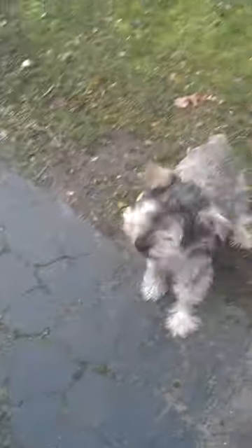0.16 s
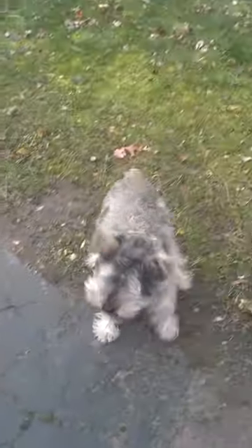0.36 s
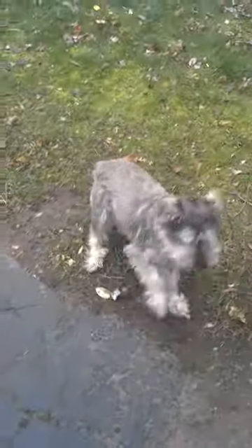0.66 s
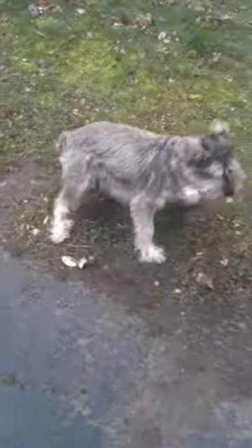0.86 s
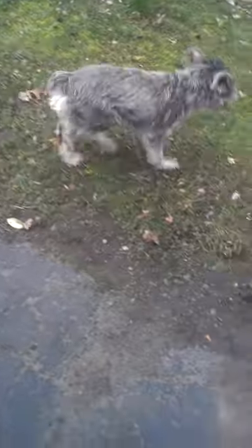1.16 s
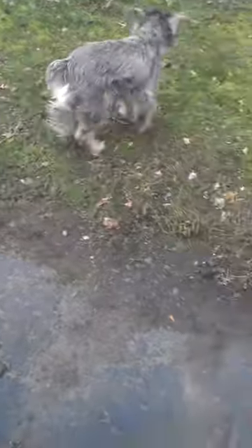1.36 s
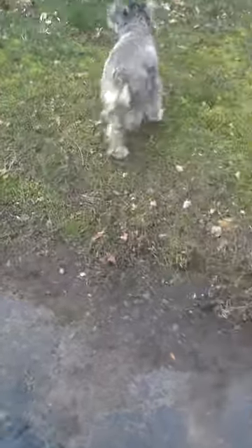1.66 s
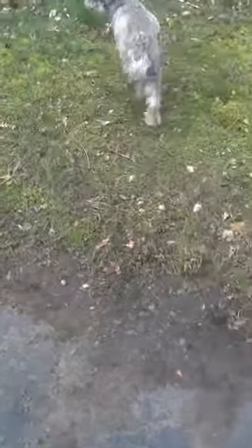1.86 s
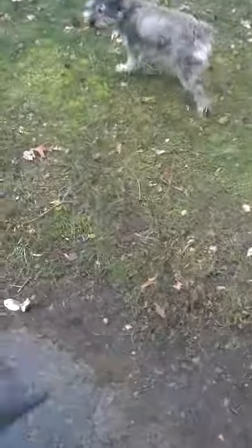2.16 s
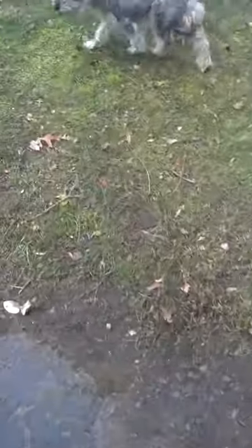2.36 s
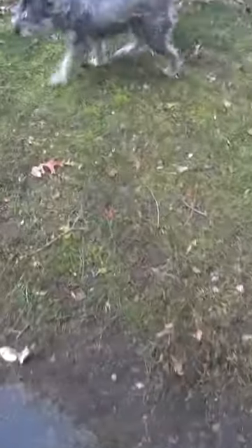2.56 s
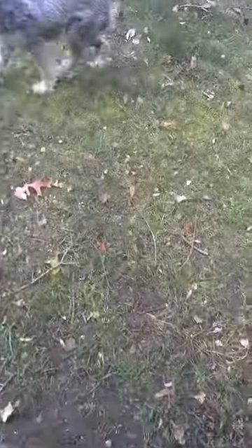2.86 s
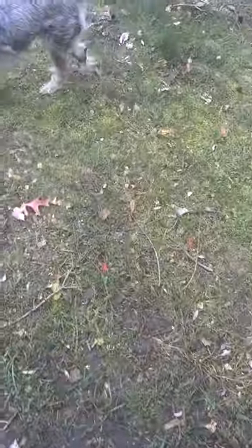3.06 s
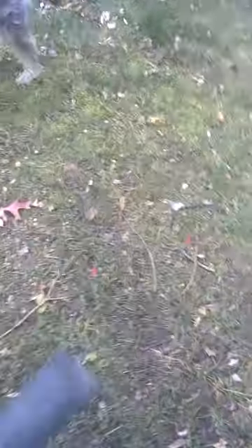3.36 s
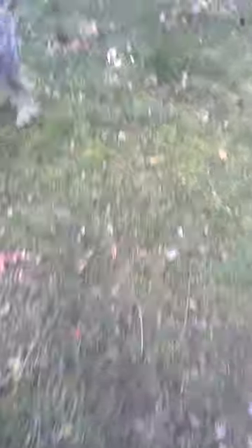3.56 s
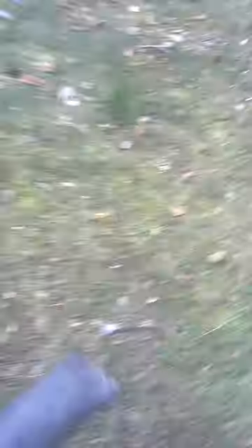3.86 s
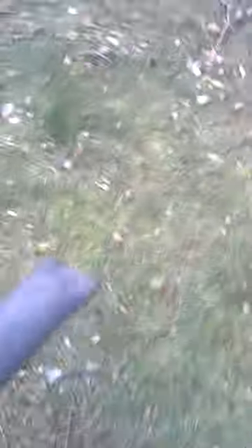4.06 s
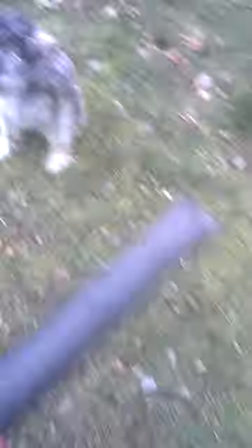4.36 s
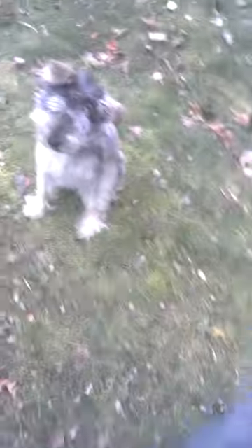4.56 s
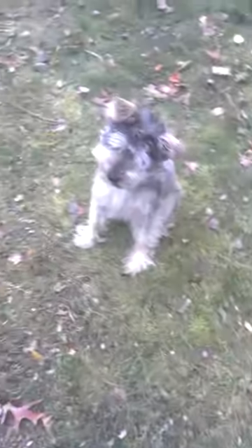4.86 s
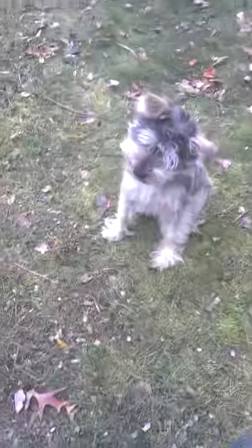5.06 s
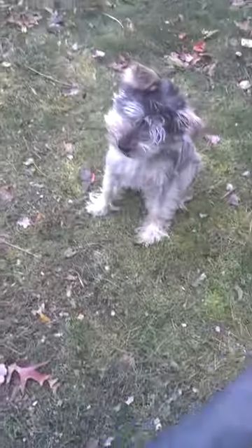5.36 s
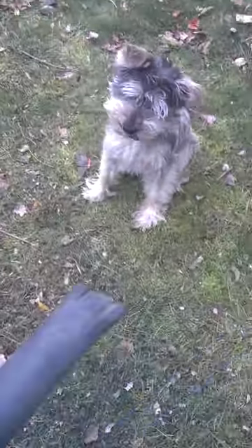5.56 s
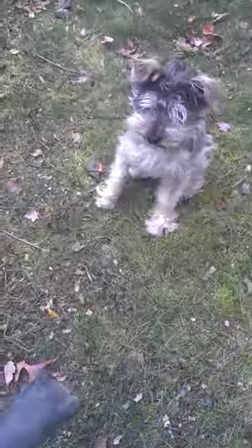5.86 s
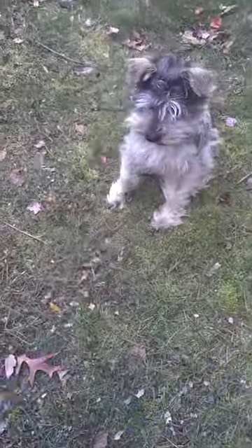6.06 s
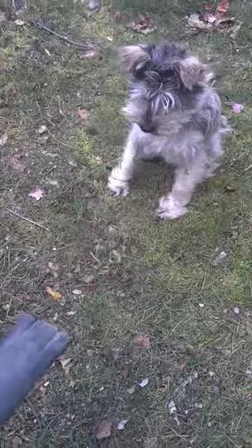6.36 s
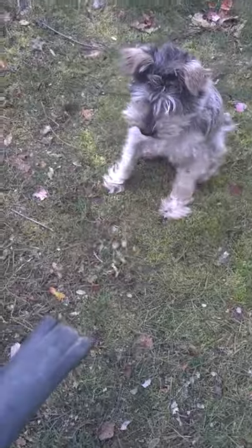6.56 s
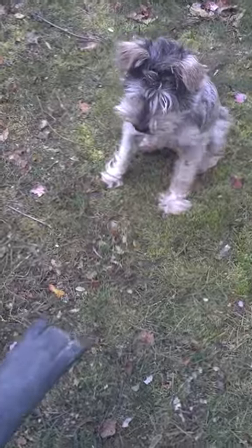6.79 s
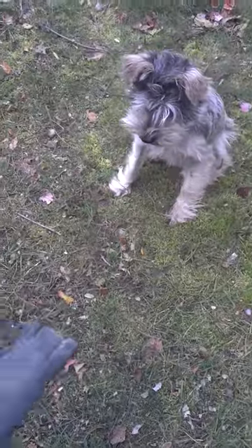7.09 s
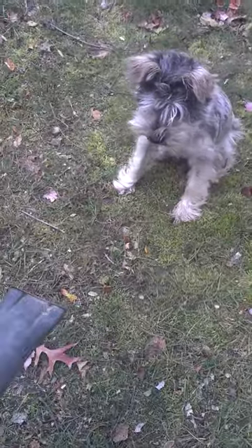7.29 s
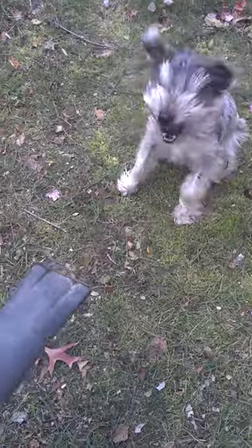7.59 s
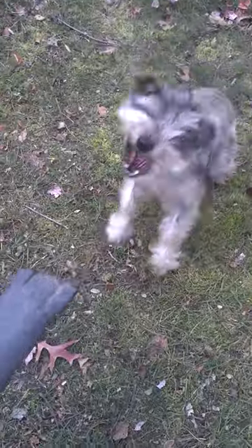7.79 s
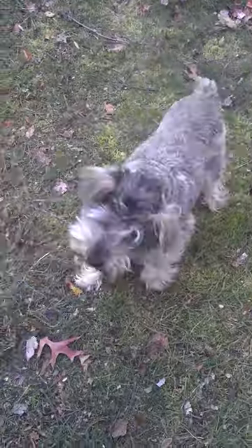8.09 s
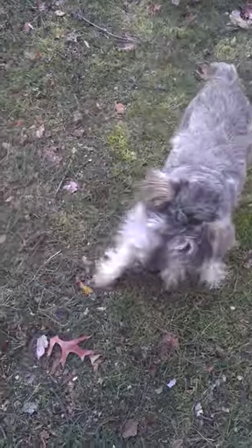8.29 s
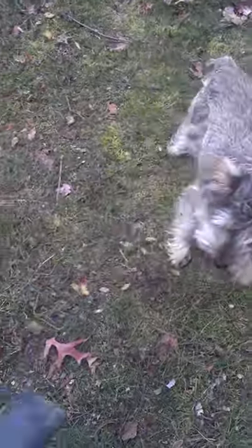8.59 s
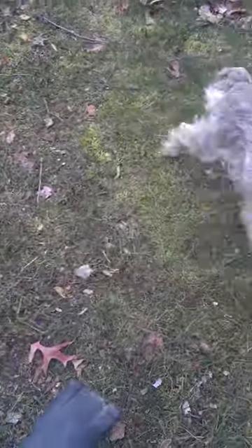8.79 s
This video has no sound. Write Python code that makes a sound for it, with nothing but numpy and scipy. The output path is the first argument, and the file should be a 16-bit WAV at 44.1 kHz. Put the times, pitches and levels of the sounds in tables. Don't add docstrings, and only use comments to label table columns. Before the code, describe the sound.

Close, dry outdoor sound on a lawn: a leaf blower's continuous turbulent rush, honky in the middle and breathy on top, with piercing blade whine shimmering as the tube swings. Early on, a little dog whimpers once, rising then sagging. Later the jet's backwash thuds against the phone microphones in irregular low gusts. The motor never changes speed or stops.

```python
import sys
import numpy as np
from scipy import signal
from scipy.fft import rfft, irfft
from scipy.io import wavfile
from scipy.ndimage import uniform_filter1d

SR = 44100
rng = np.random.default_rng(int(sys.argv[2]) if len(sys.argv) > 2 else 0)


def field_ratio(decibels):
    return 10 ** (np.asarray(decibels, dtype=float) / 20)


def digitize_waveform(pressure):
    field = np.atleast_2d(pressure).T
    bounded = np.clip(field, -1, 1)
    quanta = np.round(bounded * 32767).astype(np.int16)
    wavfile.write(sys.argv[1], SR, quanta)


N = 393813
NOW = np.arange(N) / SR
HZ = np.maximum(np.fft.rfftfreq(N, 1 / SR), 1)


def rms_one(x):
    return x / np.sqrt(np.mean(x ** 2) + 1e-20)


def in_time(rows):
    s, *columns = np.transpose(rows)
    return [np.interp(NOW, s, column) for column in columns]


def at_hz(points, hz, axis=1):
    points = np.array(points)
    return np.interp(np.log(hz), np.log(points[:, 0]), points[:, axis])


def drift(rate):
    pole = np.exp(-80 * np.pi * rate / SR)
    noise = rng.standard_normal(N // 40 + 2002)
    slow = signal.lfilter([1], [1, -2 * pole, pole * pole], noise)[2000:]
    return np.interp(np.arange(N) / 40, np.arange(len(slow)), rms_one(slow))


def white():
    return rfft(rng.standard_normal(N))


# frequency in Hz, lag of left behind right in radians.
LOW_LAG = [(90, 2.7), (130, 1.7), (200, 1.0), (400, .65), (1000, .2), (1378, 0)]


def port_lag(hz):
    gap = 16
    travel = np.pi - 2 * np.pi * hz * gap / SR
    return np.where(travel > 0, at_hz(LOW_LAG, hz), travel)


# frequency in Hz, left minus right in dB,
# share of unrelated noise from 0 to 1.
PORTS = [(90, 5, 0.2), (128, 8.5, 0.6), (196, 2.5, 0), (346, -6.5, 0.6), (700, -8, 0.18), (1000, -6, 0.38),
         (1460, -2, 0.16), (1900, 0, 0), (2880, -1, 0.41), (4430, -3.5, 0.74), (5670, -3, 0.36),
         (7000, -1.5, 0.56), (8110, -4, 0.59), (12000, -4, 0.9), (14900, -13, 0.7)]


def tone(turns, hz, level_db, rough):
    shake = [1 + rough * (drift(20.7) + 1j * drift(11)) for port in range(2)]
    shared = shake[0] * np.exp(2j * np.pi * turns)
    offset = field_ratio(at_hz(PORTS, hz)) * np.exp(-1j * port_lag(hz))
    left = shared * offset * (0.94 + 0.077 * shake[1])
    evened = 2 / abs(1 + offset)
    return np.sqrt(2) * evened * field_ratio(level_db) * np.array([left.real, shared.real])


# time in seconds, pitch in Hz, level in dB.
WHINE = [
    (1.62, 1290, -55),
    (1.72, 1400, -33),
    (1.82, 1470, -31),
    (1.95, 1505, -31),
    (2.06, 1490, -33),
    (2.15, 1445, -35),
    (2.19, 1430, -55),
]


def dog():
    hz, level_db = in_time(WHINE)
    sounding = level_db > level_db[0]
    return sounding * tone(np.cumsum(hz) / SR, 1450, level_db, rough=.12)


# time in seconds, level in dB.
WIND = [(0.0, -70), (3.55, -67), (3.75, -43.5), (3.95, -40), (4.15, -48), (4.75, -49), (5.1, -29.5),
        (5.5, -39), (5.85, -43), (6.2, -40), (6.9, -36), (7.32, -31), (7.55, -32), (7.9, -37),
        (8.04, -25.5), (8.22, -32), (8.4, -26), (8.92, -22)]
# frequency in Hz, level in dB per Hz.
GUST = [
    (30, -2),
    (60, -8),
    (100, 7),
    (140, 6),
    (200, 6),
    (300, -2.5),
    (450, -2),
    (700, -41),
    (1200, -85),
]


def backwash(lumpy_db):
    eddies = white()
    own = 0.12 * white() * (HZ / 200 + 30 / HZ)
    left = -.7 * eddies * np.exp(1j * HZ / 500) + own
    lumps = irfft(field_ratio(at_hz(GUST, HZ)) * np.array([left, eddies]), N)
    level_db = in_time(WIND)[0] + 1.5 + 1.5 * drift(5.0) + lumpy_db * drift(25)
    return field_ratio(level_db) * rms_one(lumps)


def fading(scattered, rate):
    paths = 1 + scattered * (drift(rate) + 1j * drift(rate))
    return 20 * np.log10(abs(paths) / np.sqrt(1 + 2 * scattered ** 2) + 0.028)


def swells(rows, ripple):
    null_db, rise_s = -17, 0.082
    s, start_db, end_db = np.transpose(rows)
    index = np.searchsorted(s, NOW, side="right") - 1
    since = NOW - s[index]
    until = np.append(s[1:], N / SR)[index] - NOW
    away = np.minimum(since + (index == 0), until + (index == len(s) - 1))
    height = field_ratio(null_db) + np.sin(np.pi / 2 * np.clip(away / rise_s, 0, 1))
    slope_db = (start_db[index] * until + end_db[index] * since) / (since + until)
    return uniform_filter1d(slope_db + 20 * np.log10(height), size=400) + fading(ripple, 10.0)


# time in seconds, twice the blade-pass pitch in Hz.
MOTOR_SPEED = [(0, 4674), (.25, 4660), (.6, 4680), (1.9, 4682), (2.6, 4675), (3.8, 4680), (4.6, 4674),
               (4.9, 4682), (5.5, 4678), (7.2, 4679), (7.6, 4683), (8.1, 4679), (8.93, 4682)]
# time of the null in seconds,
# level in dB as the swell starts, level in dB as it ends.
SWELLS_1ST = [(0.0, -34, -33.5), (0.25, -31, -46), (0.38, -41, -46), (0.53, -43, -37), (0.72, -38, -33.5),
              (0.97, -34, -36.5), (1.47, -34, -38), (1.85, -43, -36), (2.05, -39, -37), (2.2, -39, -42),
              (2.35, -30, -45), (3.11, -35.5, -43), (3.79, -32, -37), (3.89, -40, -27), (4.06, -35, -32),
              (4.54, -45, -34), (4.88, -36.5, -31), (5.25, -32.5, -34.5), (5.61, -36, -38),
              (5.72, -33, -48), (6.02, -46, -33), (6.3, -39, -35), (6.54, -32.5, -34), (7.02, -33, -39),
              (7.64, -30, -52), (7.85, -42, -30), (8.04, -48, -26), (8.11, -40.5, -35), (8.57, -45, -38),
              (8.73, -37, -34)]
SWELLS_2ND = [(0.0, -28, -31.5), (0.4, -27, -32), (0.48, -34, -33), (0.79, -32, -27), (0.88, -32, -31),
              (1.02, -33.5, -29), (1.51, -25.5, -33), (1.76, -30, -32), (1.83, -19, -40), (1.95, -37, -29),
              (2.09, -24, -29), (2.17, -30, -28), (2.26, -25.5, -42), (2.6, -35, -29.5), (3.08, -26, -35),
              (3.29, -22.5, -28.5), (3.43, -35, -30.5), (3.7, -37, -35), (3.89, -30, -28),
              (4.18, -30.5, -37), (4.92, -34.5, -33.5), (5.45, -40.5, -24.5), (6.31, -32.5, -28.5),
              (6.54, -30, -30.5), (7.22, -28, -32), (7.35, -34, -28), (8.5, -27, -25), (8.63, -26, -25),
              (8.72, -20.5, -33.5), (8.86, -26, -36)]
SWELLS_3RD = [(0, -38, -39.5), (0.61, -32, -28), (0.73, -35, -34), (0.83, -32, -36), (1.02, -38, -32),
              (1.17, -32, -36), (1.3, -31, -31), (1.45, -24, -32), (1.52, -36, -31), (1.68, -35, -34),
              (1.95, -32, -35), (2.2, -30, -44), (2.49, -50, -38), (2.78, -41, -30), (2.98, -37, -33),
              (3.03, -40, -43), (3.45, -38, -40), (3.75, -26, -38), (3.85, -40, -34), (4.14, -39, -44),
              (4.46, -45, -44), (5.35, -38, -41.5), (5.81, -39, -38), (6.16, -37, -49), (6.93, -40, -36),
              (7.12, -43, -47), (7.41, -47, -39), (8.31, -40, -39), (8.56, -38, -38), (8.71, -33, -42)]
# time in seconds, level in dB.
BEAM = [(0, -63), (2.3, -56), (2.5, -49), (2.65, -52), (2.9, -48), (3.3, -52.5), (3.5, -60), (3.9, -48),
        (4.15, -43), (4.4, -62), (4.85, -56), (5.3, -58), (5.85, -55), (6.0, -46), (6.2, -61), (8.93, -57)]
# blade-pass multiple, share of the beam's swing from 0 to 1, level in dB re the beam.
UPPER_TONES = [
    (4, 1.0, -1.5),
    (5, .3, -12),
    (6, .3, -21),
]
# multiple of the shaft rate, level in dB.
SHAFT = [
    (1, -44.5),
    (2, -43.5),
    (3, -44),
]


def fan():
    blade_hz = in_time(MOTOR_SPEED)[0] / 2 + 1.42 * drift(2.78)
    turns = np.cumsum(blade_hz) / SR
    out = tone(turns, 2200, swells(SWELLS_1ST, ripple=.15), rough=.06)
    out += tone(2 * turns, 4700, swells(SWELLS_2ND, ripple=.21), rough=.13)
    out += tone(3 * turns, 7020, swells(SWELLS_3RD, ripple=.25), rough=.15)
    beam = in_time(BEAM)[0]
    for k, share, db in UPPER_TONES:
        level_db = share * beam + (1 - share) * beam.mean() + db
        out += tone(k * turns, 2340 * k, level_db, rough=0.54)
    for k, db in SHAFT:
        out += tone(k * turns / 10, 234 * k, db, rough=0.16)
    return out


# time in seconds,
# length in seconds, change of stray sound in dB.
STRAY_DIPS = [(.33, 0.43, -4.5), (.77, .26, -12), (1.17, .06, -9), (1.35, .07, -9), (1.692, .08, -11),
              (1.88, .05, -5), (2.07, 0.077, -9), (2.22, .14, -22), (2.55, .1, -11), (2.71, .06, -11),
              (2.86, .07, -13), (3.03, .07, -13), (3.17, .1, -11), (3.37, .06, -9), (3.85, .12, -11),
              (4.4, .06, -10), (5.4, 0.083, -10), (5.56, .06, -2), (5.68, .12, -7), (5.92, 0.055, -8),
              (6.38, 0.094, -8), (6.56, 0.056, -12), (6.76, .04, -7), (6.9, .05, -9), (7.2, .04, -7),
              (7.3, .05, -7), (7.56, 0.12, -8), (7.76, 0.16, -6), (8.1, 0.39, -6.5), (8.72, 0.044, -12)]


def stray_level():
    return 3 + sum(db * np.exp(-(2 * (NOW - s) / length) ** 4) for s, length, db in STRAY_DIPS)


# time in seconds, tube roar in dB,
# turn of the nozzle towards the ports in dB.
STREAM = [(0.0, -21.5, -0.5), (0.35, -23.5, -0.5), (0.75, -22.5, -2), (1.1, -21, -0.5), (1.7, -22.5, 1.5),
          (2.2, -21.5, -2.5), (2.6, -21.5, 0), (3.2, -22.5, 1.5), (3.7, -22.5, 0), (4.2, -21, -1),
          (4.95, -19.5, -3), (5.45, -21, -3), (5.95, -20.5, -1), (6.9, -21.5, 0), (7.68, -20, -2.5),
          (8.0, -21.5, 0.5), (8.55, -23, 1.5), (8.92, -20.5, -3.5)]
# frequency in Hz, level in dB per Hz.
AIR = [(40, -29), (90, -30), (130, -23), (200, -13.5), (300, -4.5), (450, 0), (800, -1), (1300, -5),
       (2000, -8), (3300, -11), (5500, -13), (8000, -19.5), (12000, -29), (15500, -29.5)]
# frequency in Hz, width in Hz,
# boost in dB.
PEAKS_AND_DIPS = [
    (357, 127, 3.5),
    (445, 106, 2.5),
    (665, 68, 7),
    (1073, 68, 3),
    (1267, 280, 4.5),
    (1740, 160, 2.5),
    (539, 21, -5),
    (13900, 1900, -4),
    (2110, 510, 0.5),
]


def air(back_share, patchy_db, fast_db):
    roar_db, turn_db = in_time(STREAM)
    hiss_db = 0.9 * turn_db
    top_db = 0.95 * turn_db - 0.45 * NOW
    scatter_db = stray_level() + 1.2 * drift(10)
    colour = at_hz(AIR, HZ) + sum(db / (1 + (2 * (HZ - hz) / width) ** 2) for hz, width, db in PEAKS_AND_DIPS)

    front, back = white(), back_share * white()
    turn = np.exp(-1j * port_lag(HZ))
    loose = np.clip(at_hz(PORTS, HZ, axis=2), 0, 1)
    total = np.sqrt(1 + back_share ** 2)
    right = (front + back) / total
    twin = (front * turn + back / turn) / total
    left = field_ratio(at_hz(PORTS, HZ)) * (np.sqrt(1 - loose ** 2) * twin + loose * white())
    parts = field_ratio(colour) * np.array([twin, left - twin, right])
    parts = parts / np.std(irfft(parts[2] * (HZ > 300) * (HZ < 1500), N))

    out, neighbour, step = 0, drift(1), .4
    for octave in np.arange(5, 14.4, step):
        window = np.clip(1 - abs(np.log2(HZ) - octave) / step, 0, 1)
        hiss = np.clip((octave - 10.3) / 2.2, 0, 1)
        top = np.clip((octave - 12.5) / 1.0, 0, 1)
        swing = hiss * (1 - top) * (hiss_db - hiss_db.mean()) + top * (top_db - top_db.mean())
        own = drift(0.92)
        flicker = patchy_db * (own + neighbour) + fast_db * (0.64 + .5 * top) * drift(12.7)
        matched, stray, right = irfft(parts * window, N)
        left = matched + stray * field_ratio(scatter_db * (11 < octave < 13))
        out = out + field_ratio(swing + flicker) * np.array([left, right])
        neighbour = own
    return field_ratio(roar_db + 1.5) * out


def scene():
    stream = air(back_share=0.43, patchy_db=.8, fast_db=2.2)
    return dog() + backwash(lumpy_db=2.5) + fan() + stream


def top_cut(x):
    return signal.sosfilt(signal.butter(12, 16490, fs=SR, output="sos"), x)


def record(dry):
    thinned = signal.sosfilt(signal.butter(2, 55, "high", fs=SR, output="sos"), dry)
    top_hz = 15700
    cut = signal.sosfilt(signal.ellip(12, .3, 70, top_hz, fs=SR, output="sos"), thinned)
    return top_cut(cut)


dry = scene()
out = record(dry)
digitize_waveform(out)
```